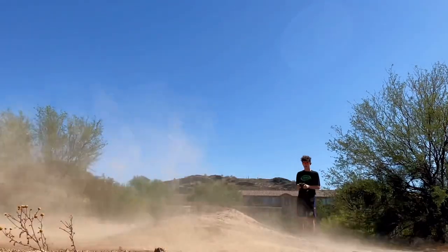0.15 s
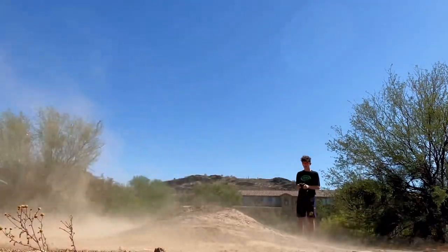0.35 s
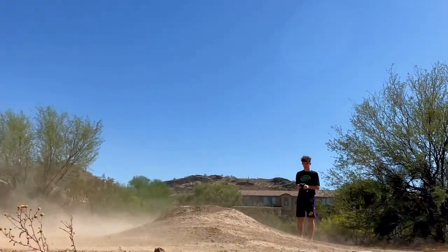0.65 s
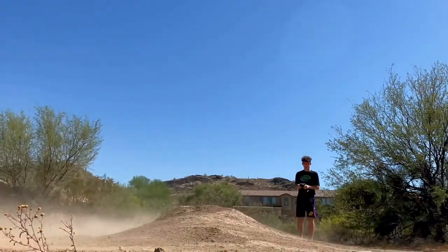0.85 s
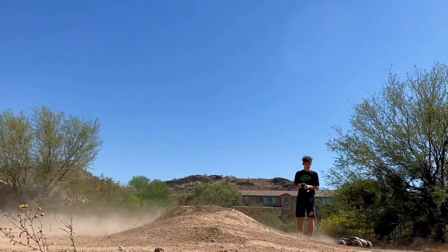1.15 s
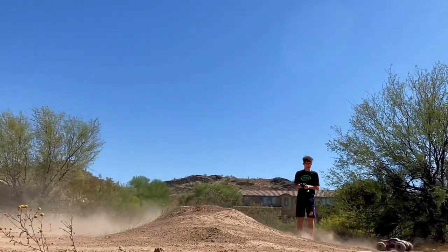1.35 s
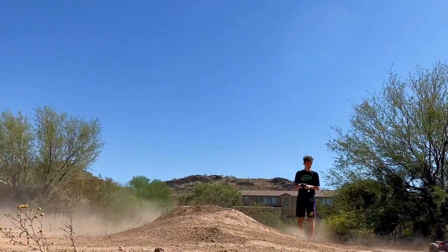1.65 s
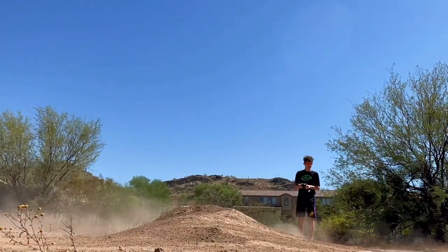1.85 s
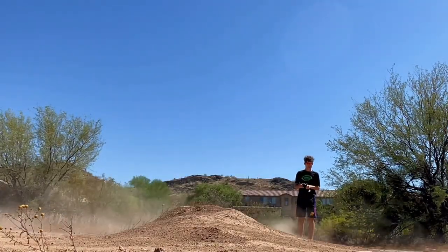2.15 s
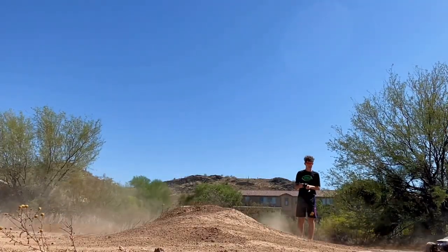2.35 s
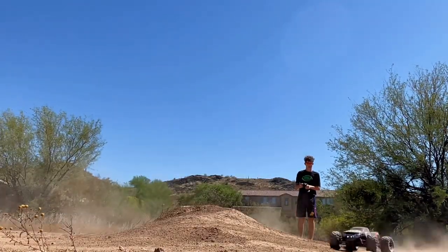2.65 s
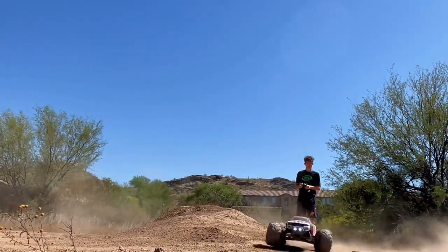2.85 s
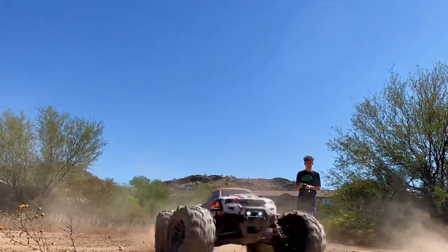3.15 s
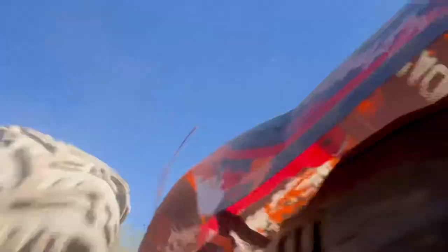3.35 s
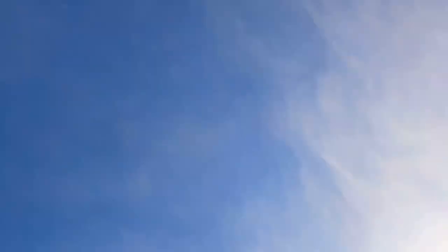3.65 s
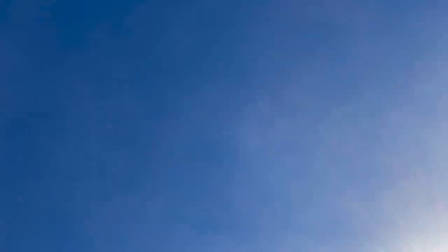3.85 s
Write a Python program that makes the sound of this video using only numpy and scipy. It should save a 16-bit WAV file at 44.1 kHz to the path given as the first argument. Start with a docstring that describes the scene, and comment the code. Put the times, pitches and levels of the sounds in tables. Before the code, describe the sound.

Small toy truck rattles on gravelly dirt, fades, speeds up close and crashes in overloaded thumps.

```python
"""A dirt lot: a remote-controlled truck circles, coasts, then speeds straight into a camera on the ground.
Random tyre blows ring its hollow body, fine grains make the crunch and grit, banded noise the gear whirr. Wind
at the microphone is low noise with soft thumps; bright ticks, snaps and scrapes are short bursts. The camera is
knocked over and tumbles in overloaded thumps, each heard as a quick fall in pitch."""
import sys
import numpy as np
from scipy import signal
from scipy.fft import rfft, irfft
from scipy.io import wavfile

SR = 44100
rng = np.random.default_rng(int(sys.argv[2]) if len(sys.argv) > 2 else 0)


def unload_audio(sound):
    """Save the sound as a 16-bit wav file, at the path given as the first command line argument."""
    columns = np.transpose(np.atleast_2d(sound))
    # keep every value between -1 and 1, then stretch to whole-number steps
    steps = np.round(np.clip(columns, -1, 1) * 32767)
    wavfile.write(sys.argv[1], SR, steps.astype(np.int16))


N = 176400
T = np.arange(N) / SR

# the truck's drive past the microphone, before trims and flicker:
# (t/s, body level/dB, midrange crunch level/dB, grit level/dB)
DRIVE = [(0, -31.5, -44, -60), (.17, -32.5, -51, -63.5), (.42, -32.5, -46.5, -66.5),
         (.62, -34.5, -44, -62.5), (.8, -34.5, -46.5, -62.5), (.92, -34.5, -43, -57.5),
         (.97, -37.5, -52, -64.5), (1.07, -40.5, -52, -68), (1.12, -42.5, -51.5, -63), (1.2, -43, -54, -72),
         (1.48, -42, -57, -75), (1.66, -40.5, -51.5, -67), (1.92, -44, -60, -72.5), (2.05, -38, -40.5, -56),
         (2.18, -28, -35.5, -48), (2.35, -28.5, -36.5, -46.5), (2.5, -27, -35.5, -48),
         (2.55, -30, -37.5, -53.5), (2.68, -30.5, -38, -51), (2.76, -27.5, -35, -45), (2.87, -26, -30, -38),
         (3.06, -18.5, -24, -31), (3.19, -18, -22.5, -27.5), (3.245, -16, -23, -27), (3.3, -12, -16.5, -25),
         (3.335, -21, -33.5, -26.5), (3.36, -30, -42, -44.5), (3.48, -49, -61, -54), (3.62, -60, -52, -58),
         (3.7, -41.5, -73, -58), (3.81, -71, -70, -59.5), (3.84, -60.5, -82, -70), (4, -72, -85, -78.5)]
# balance of the truck and its scrapes (t/s, left minus right level/dB)
BALANCE = [(0, 4.5), (.5, 1), (1, 0), (2.1, -2), (3.05, 0.5), (3.28, 1.5), (3.5, -8.5), (4, -2)]
TICK_RISE_S = 0.0011  # attack of cracks, clacks, ticks and snaps
LEFT_RIGHT = np.array([[.5], [-.5]])  # shares a difference between the two ports


def amp(db):
    """Decibels to gain."""
    return 10 ** (np.asarray(db) / 20)


def unit(x):
    """Scales to rms 1."""
    return x / np.sqrt(np.mean(x ** 2) + 1e-20)


def curve(table, axis=1):
    """One column of a time table, at every sample."""
    rows = np.array(table)
    return np.interp(T, rows[:, 0], rows[:, axis])


def read(points, hz):
    """Reads a spectrum on a log-frequency axis."""
    f, value = np.transpose(points)
    return np.interp(np.log(hz + 1), np.log(f), value)


def add(mix, s, sound):
    """Mixes a stereo sound in at time s, trimming what falls outside."""
    at = round(s * SR)
    sound = sound[:, max(-at, 0):]
    part = mix[:, max(at, 0):][:, :sound.shape[1]]
    part += sound[:, :part.shape[1]]


def pan(db):
    """Left and right gains for a level difference."""
    return amp(LEFT_RIGHT * db)


def burst(start, rise, hold, decay):
    """An envelope of attack, hold and exponential release, all in seconds."""
    t = np.maximum(T - start, 0)
    return np.minimum(t / rise, 1) * np.exp(-np.maximum(t - rise - hold, 0) / decay)


def noise():
    """Two channels of white noise."""
    return rng.standard_normal((2, N))


def grains(per_s, spread_db):
    """Random tiny impacts of uneven size and either sign."""
    size = amp(spread_db * np.minimum(rng.exponential(1, (2, N)), 3))
    struck = rng.random((2, N)) < per_s / SR
    return unit(size * np.sign(noise()) * struck)


def wobble(rate_hz):
    """Random motion of rms 1, weaker above rate_hz and without drift below a tenth of it."""
    hz = np.fft.rfftfreq(N, 1 / SR)
    gain = (hz > rate_hz / 10) / (1 + (hz / rate_hz) ** 2)
    return unit(irfft(rfft(rng.standard_normal(N)) * gain, N))


def colour(x, spectrum=None):
    """Shapes two unrelated signals and makes them as alike as the two microphone ports hear them."""
    # likeness of the ports (f/Hz, left-right correlation)
    likeness = [(60, 0.73), (250, 0.85), (500, 0.89), (1200, 0.94), (3000, 1), (5500, 1), (9000, 0.92),
                (11000, 1), (14500, 0.93)]
    hz, (a, b) = np.fft.rfftfreq(N, 1 / SR), rfft(x)
    same = np.clip(read(likeness, hz), -.99, .99)
    mid, side = a * np.sqrt(1 + same), b * np.sqrt(1 - same)
    gain = 1 if spectrum is None else amp(read(spectrum, hz))
    return unit(irfft(np.array([mid + side, mid - side]) * gain, N))


def resonate(x, hz, width):
    """A resonance of gain 1: shifts hz down to zero, smooths there and shifts back."""
    turn, r = np.exp(2j * np.pi * hz * T), np.exp(-np.pi * width / SR)
    return 2 * (turn * signal.lfilter([1 - r], [1, -r], x / turn)).real


def resonate_twice(x, hz, width):
    """The same resonance in two passes, for steeper flanks, at rms 1."""
    return unit(resonate(resonate(x, hz, width), hz, width))


def narrow(x, hz, width):
    """A band of steady power whose centre and width (at -6 dB) follow curves."""
    f, t, z = signal.stft(x, SR, nperseg=512, noverlap=384)
    centre, wide = np.interp(t, T, hz), np.interp(t, T, width)
    gain = (1 + (1.22 * (f[:, None] - centre) / wide) ** 2) ** -2.1 / np.sqrt(wide)
    return signal.istft(z * gain, SR, nperseg=512, noverlap=384)[1][:, :N]


def ports(x, table):
    """Phase and level differences between the left and right microphone ports."""
    size = N + SR // 10  # room against wrap-around
    hz, (f, lead, db) = np.fft.rfftfreq(size, 1 / SR), np.transpose(table)
    turn = np.exp(1j * np.array([[1], [0]]) * np.interp(hz, f, lead))
    return irfft(rfft(x, size) * turn * pan(np.interp(hz, f, db)), size)[:, :N]


def thump(hard_hz, lag_s):
    """A blow heard as a quick downward sweep in pitch, later in the left port; a harder blow is loudest higher
    up."""
    start_hz, glide_s, low_hz = 4590, .000305, 73.1  # below low_hz the thud fades away
    t = np.maximum(np.arange(SR // 8) / SR - LEFT_RIGHT * lag_s, 0)
    hz = start_hz / (1 + t / glide_s)
    size = hz / hard_hz / np.sqrt(1 + (hz / hard_hz) ** 11)
    size = size / np.sqrt(1 + (low_hz / hz) ** 5)
    return size * np.sin(2 * np.pi * start_hz * glide_s * np.log1p(t / glide_s))


def wind():
    """Low noise of uneven level on the microphone, with soft thumps and flutter at each buffet."""
    # steady rumble (f/Hz, level per Hz/dB)
    rumble_spectrum = [(20, -32), (60, 2.5), (100, 1), (160, -6), (300, -6), (700, -16), (3000, -58.5),
                       (16000, -79)]
    # rumble before its flicker (t/s, level/dB)
    rumble_level = [(0, -40), (.45, -37), (.65, -41), (1, -43.5), (1.5, -47), (2.4, -43.5), (2.9, -38.5),
                    (3.3, -50.5), (3.8, -32), (3.88, -55.5), (4, -54)]
    # flutter after a buffet (f/Hz, level per Hz/dB)
    flutter_spectrum = [(20, -44), (70, 11), (130, -3), (250, -7.5), (400, -18.5), (1000, -24.5),
                        (16000, -92)]
    # buffets on the microphone (t/s, thump level/dB, hardness f/Hz, flutter level/dB)
    buffets = [(-.015, -29, 93, -18), (0.0243, -9.5, 121, -27.5), (0.218, -11.5, 71.5, -36),
               (0.276, -22.5, 130, -41), (0.3748, -8, 82.5, -21.5), (0.545, -30.5, 130, -37),
               (0.729, -21.5, 131, -29), (0.996, -23, 147, -41), (1.235, -30, 113, -31)]
    out = colour(noise(), rumble_spectrum) * amp(curve(rumble_level) + 1.9 * wobble(rate_hz=29))
    flutter = colour(noise(), flutter_spectrum)
    for s, db, hard_hz, flutter_db in buffets:
        add(out, s, amp(db) * thump(hard_hz, lag_s=0.00052))
        out += amp(flutter_db) * burst(s, rise=0.0091, hold=0.01, decay=0.026) * flutter
    return out


def tyres_on_body():
    """Tread blows ring the resonances of the hollow body, over a broader roll on the dirt."""
    # rolling tyres (f/Hz, level per Hz/dB)
    roll_spectrum = [(30, -29.5), (90, -4.5), (220, -9), (330, -4.5), (520, 0.5), (750, 0), (1100, 4.5),
                     (1400, -5.5), (1800, -14.5), (3000, -48), (16000, -70.5)]
    # resonances of the hollow body (f/Hz, half the width of each pass/Hz, relative level/dB)
    body_modes = [(387.6, 48.7, 6), (433, 100, -8.5), (1075, 130, -9), (1159, 99, -1.5), (1263, 27, -9)]
    ring_db, roll_db = -2.5, -3.5
    tread = colour(grains(per_s=2500, spread_db=3), roll_spectrum)
    ring = unit(sum(amp(db) * resonate_twice(tread, hz, 2 * width) for hz, width, db in body_modes))
    roll = colour(grains(per_s=5000, spread_db=2.5), roll_spectrum)
    return (amp(ring_db) * ring + amp(roll_db) * roll) * amp(curve(DRIVE, axis=1))


def crunch():
    """Dirt under the tyres: dense midrange grains of flickering level."""
    # crunching dirt (f/Hz, level per Hz/dB)
    crunch_spectrum = [(500, -26.5), (1100, -5), (1550, 1), (2100, -0.5), (2600, -8.5), (3100, -8),
                       (3400, -21), (4500, -26), (16000, -76)]
    trim_db = -2
    level = trim_db + curve(DRIVE, axis=2) + 1.8 * wobble(rate_hz=29)
    return colour(grains(per_s=7000, spread_db=0.5), crunch_spectrum) * amp(level)


def spray():
    """Fine grit thrown by the tyres; air dulls it at a distance, so it brightens as it comes near."""
    # grit close by (f/Hz, level per Hz/dB)
    grit_spectrum = [(1500, -24.5), (3150, -2.5), (3500, -7.5), (3900, 0.5), (5000, -3), (6200, -6.5),
                     (7400, -17), (8600, -0.5), (10500, -14.5), (13000, -16.5), (14500, -10.5),
                     (16000, -20)]
    air_hz, near_db, trim_db = 5500, -48.5, 1.5  # full treble from near_db up
    db = curve(DRIVE, axis=3)
    near = colour(grains(per_s=12000, spread_db=2.5), grit_spectrum)
    air = signal.butter(2, air_hz, fs=SR, output="sos")
    far = signal.sosfilt(air, near)
    far = signal.sosfilt(air, far[:, ::-1])[:, ::-1]  # backwards, to undo the delay
    share = np.clip(amp(0.4 * (db - near_db)), 0, 1)
    return (share * near + (1 - share) * unit(far)) * amp(trim_db + db + 1.9 * wobble(rate_hz=28))


def gears():
    """Gear whirr: a band of noise whose pitch and level waver around the drive's curves."""
    # whirr before wavering (t/s, centre f/Hz, level/dB, width/Hz)
    whirr_curves = [(0, 2650, -57.5, 809), (.5, 2560, -51, 802), (.9, 3050, -58.5, 800),
                    (1.05, 2500, -71, 794), (1.9, 2550, -81, 810), (2.15, 2190, -51, 718),
                    (2.47, 2400, -48, 694), (2.58, 2300, -55, 597), (2.7, 3020, -55, 595),
                    (2.85, 2970, -38.5, 350), (2.93, 2900, -31.5, 300), (3.0, 2910, -28, 297.6),
                    (3.1, 2840, -24.5, 305), (3.2, 2800, -33, 450), (3.33, 2800, -20.5, 883),
                    (3.355, 2760, -45, 1183), (3.62, 2750, -76, 1523), (3.71, 2900, -45, 1790),
                    (3.83, 2510, -56, 1354), (4, 2496, -68, 1180)]
    centre_hz = curve(whirr_curves) * (1 + 0.008 * wobble(rate_hz=15))
    whirr = unit(narrow(colour(noise()), centre_hz, curve(whirr_curves, axis=3)))
    return whirr * amp(curve(whirr_curves, axis=2) + 2.0 * wobble(rate_hz=39))


def bumps():
    """Each jolt sets the hollow body humming at a wavering pitch and its panels rattling."""
    # wheels jolt over bumps and into the camera (t/s, body hum level/dB, panel rattle level/dB)
    jolts = [(.12, -37, -58), (.18, -30, -41), (.349, -27, -52), (.425, -23.5, -38), (.552, -32, -41),
             (.648, -28.5, -42), (.708, -28, -34), (.782, -48, -44), (.89, -28, -42), (.915, -34.5, -54),
             (1.237, -35, -52), (1.562, -37.5, -48), (2.339, -34, -33), (2.431, -22.5, -27),
             (2.49, -29, -42), (2.565, -33, -48), (2.658, -25.5, -44), (2.869, -21.5, -27.5),
             (2.933, -32, -30), (2.96, -21.5, -32.5), (3.055, -27, -20.5), (3.1, -13, -22),
             (3.14, -24, -22), (3.252, -6.5, -9.5), (3.318, 0, -19)]
    hum_hz, rattle_hz = 395.4, 1123
    hum = np.sin(2 * np.pi * np.cumsum(hum_hz * (1 + .05 * wobble(rate_hz=40))) / SR)
    rattle = resonate_twice(colour(grains(per_s=2000, spread_db=2.5)), rattle_hz, 380)
    out = np.zeros((2, N))
    for s, db, rattle_db in jolts:
        jolt = burst(s, rise=0.0054, hold=0.011, decay=0.0082)
        out += (amp(db) * hum + amp(rattle_db) * rattle) * jolt
    return out


def truck():
    """All the truck's sounds flicker together and reach the two ports from its changing direction."""
    # how the ports hear a source far to the right (f/Hz, left lead/rad, left minus right level/dB)
    from_right = [(100, -0.05, 5.5), (510, -1.44, 4), (860, -1.8, 1.5), (1700, -1.67, 3.5),
                  (2350, -1.5, 11.5), (2550, -1, 11), (3350, -4.5, 17.5), (4000, -4.5, 12),
                  (5540, -5.5, 2.5)]
    # how far the truck is to the right (t/s, share 0-1)
    off_right = [(0, 0.35), (1.05, 0), (1.35, 0.7), (2.1, 0.8), (2.6, 0.51), (2.82, 0), (4, 0.42)]
    sound = tyres_on_body() + bumps() + crunch() + spray() + gears()
    sound = sound * amp(1.3 * wobble(rate_hz=110)) * pan(curve(BALANCE))
    aside = np.clip(curve(off_right), 0, 1)
    return (1 - aside) * sound + aside * ports(sound, from_right)


def ticks_and_snaps():
    """Bright ticks and snaps of small stones and plastic: short bursts of high-passed grains."""
    # bright ticks and snaps (t/s, level/dB, decay/s, lowest f/Hz)
    tick_table = [(.032, -34, 0.00075, 8000), (0.889, -39, 0.0077, 3800), (0.929, -51.5, 0.021, 4000),
                  (1.121, -57.5, 0.027, 4000), (1.246, -60, 0.0036, 4800), (1.956, -59, .006, 4000),
                  (2.405, -52, .004, 4000), (2.56, -38, 0.0041, 4600), (3.286, -15.5, 0.0024, 3500),
                  (3.3291, -12, 0.0012, 2500), (3.3365, -14.5, 0.001, 2464), (3.5188, -32.5, 0.0012, 5200),
                  (3.7046, -33.5, 0.0008, 3800), (3.7514, -34.5, .0013, 4390)]
    # grains before the high-pass (f/Hz, level per Hz/dB)
    tick_spectrum = [(1500, -29), (3500, -21), (5000, 3.5), (6300, -5.5), (9000, -6), (12000, -20),
                     (16000, -20)]
    ticks, out = colour(grains(per_s=7300, spread_db=3), tick_spectrum), np.zeros((2, N))
    for s, db, decay, low_hz in tick_table:
        tick = signal.sosfilt(signal.butter(4, low_hz, "highpass", fs=SR, output="sos"), ticks)
        out += amp(db) * burst(s, TICK_RISE_S, 0, decay) * unit(tick)
    return out


def scrapes():
    """Close rasps of rubber and plastic, jumping from side to side, each with a boom of the hollow body."""
    # tyres and bumper scrape ground and camera (t/s, hold/s, rasp level/dB, body boom level/dB)
    strokes = [(3.201, 0.0051, -9, -22), (3.214, 0.0026, -17.5, -19.5), (3.232, 0.0045, -12.5, -21),
               (3.252, 0.015, -10.5, -14.5), (3.275, 0.0037, -11, -11.5), (3.288, 0.0071, -10, -5),
               (3.315, 0.017, -11, -14.5), (3.402, 0.0061, -19.5, -18.5), (3.506, 0.008, -42.5, -40.5),
               (3.647, 0.012, -35.5, -38.5)]
    # rasp (f/Hz, level per Hz/dB)
    rasp_spectrum = [(40, -32.5), (250, -16), (400, -2), (650, -9), (1100, 5), (1550, -8), (2700, -10),
                     (5500, -21), (9000, -28), (12500, -25.5), (16000, -28)]
    rasp = colour(grains(per_s=3500, spread_db=4.5), rasp_spectrum) * pan(4.5 * wobble(rate_hz=270))
    boom = resonate_twice(colour(noise()), 400, 150)
    out = np.zeros((2, N))
    for s, length, db, boom_db in strokes:
        stroke = burst(s, rise=0.0026, hold=length, decay=0.0097)
        out += (amp(db) * rasp + amp(boom_db) * boom) * stroke
    return pan(curve(BALANCE)) * out


def clack():
    """The short ring of the camera's case: decaying sines."""
    # case modes (f/Hz, time to fall 60 dB/s, relative level/dB)
    case_modes = [(880, .018, -18.5), (1070, 0.013, -6)]
    t = np.arange(SR // 8) / SR
    ring = sum(amp(db - 60 * t / t60) * np.sin(2 * np.pi * hz * t) for hz, t60, db in case_modes)
    return ring * np.minimum(t / TICK_RISE_S, 1)


def knocks():
    """Each blow on the camera is a deep thump and hard clack in both ports, and a dry crack to one side."""
    # blows (t/s, thump level/dB, hardness f/Hz, crack level/dB, crack left minus right level/dB,
    # clack level/dB)
    blows = [(3.318, -1, 430, -6, -16, -12), (3.3232, -2, 450, -6, 25, -19),
             (3.3303, -11, 445, -10, 18, -24), (3.3367, 8.5, 403, -39, 0, -4),
             (3.3477, -0.5, 423, -13.5, 26, -26), (3.4063, -14, 800, -4, 12, -9),
             (3.4127, 0.5, 407, -13, -2, -14.5), (3.4338, -9.5, 510, -21, 12, -16),
             (3.5188, -14, 300, -26.5, 14, -37), (3.5515, 7.5, 610, -10, 2, -27),
             (3.5652, -28, 607, -28, -21, -28), (3.5807, -23, 500, -37.5, 27, -44),
             (3.6086, -9, 309, -21, 6, -41), (3.6415, -19, 606, -30, -19, -36),
             (3.6487, -4, 238, -36, 5.5, -46), (3.6583, 11.5, 271, -17, 14.5, -1),
             (3.7026, -1.5, 332, -19.5, 13.5, -20), (3.7072, 1, 255, -36, 5, -39),
             (3.73, 2, 230, -26.5, 17, -44.5), (3.751, -5, 183.6, -39, 17, -52),
             (3.7671, -9, 145.5, -34, 18, -47.5)]
    # dry crack (f/Hz, level per Hz/dB)
    crack_spectrum = [(100, 8), (450, 17.5), (700, 9.5), (1100, 4), (1700, -6.5), (3500, -6.5),
                      (6000, -15.5), (10000, -22), (13000, -29.5), (16000, -23)]
    crack_s, crack_hard_hz = 0.0028, 395  # crack decay at this hardness; softer blows die sooner
    out, cracks = np.zeros((2, N)), np.zeros((2, N))
    for s, db, hard_hz, crack_db, pan_db, clack_db in blows:
        add(out, s, amp(db) * thump(hard_hz, lag_s=0.00036) + amp(clack_db) * clack())
        decay = crack_s * np.sqrt(hard_hz / crack_hard_hz)
        cracks += amp(crack_db) * burst(s, TICK_RISE_S, 0, decay) * pan(pan_db)
    return out + cracks * colour(grains(per_s=6700, spread_db=1.5), crack_spectrum)


def scene():
    """Everything that reaches the microphone."""
    return wind() + truck() + ticks_and_snaps() + scrapes() + knocks()


def record(dry):
    """The ports colour the sound; the recorder overloads at full scale, then limits the band."""
    # the two microphone ports differ in the treble (f/Hz, left lead/rad, left minus right level/dB)
    port_table = [(1000, 0, 0), (1700, 0, -2), (2200, 0, 0), (4800, 0, 1), (6100, -.15, 5), (6400, -1.2, 6),
                  (6750, -3.14, 0), (7950, -3.14, 0), (9000, -4.5, 0), (10200, -6.28, 0), (12100, -6.28, 0),
                  (13400, -9.2, 0), (15000, -9.42, 0), (16000, -10.2, 0)]
    cutoff_hz = 15850
    heard = ports(dry, port_table)
    clipped = heard / (1 + heard ** 8) ** (1 / 8)
    lowpass = signal.firwin(511, cutoff_hz, window=("kaiser", 9), fs=SR)
    return signal.oaconvolve(clipped, lowpass[None], "same")


dry = scene()
out = record(dry)
unload_audio(out)
```